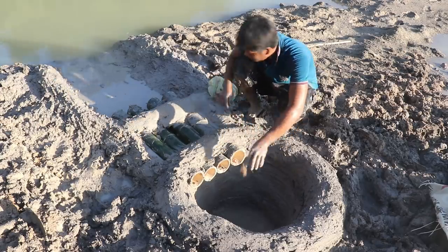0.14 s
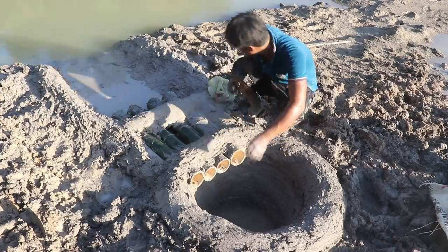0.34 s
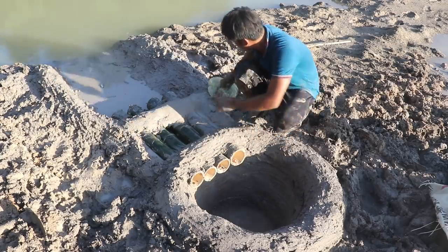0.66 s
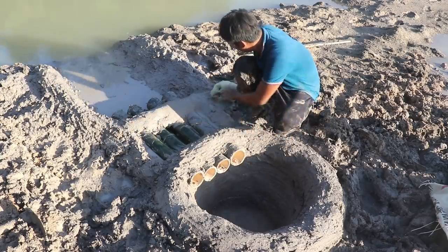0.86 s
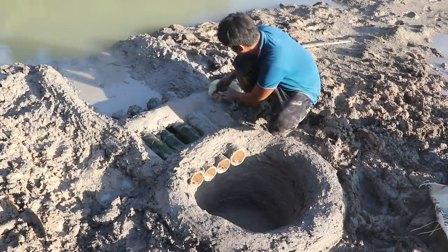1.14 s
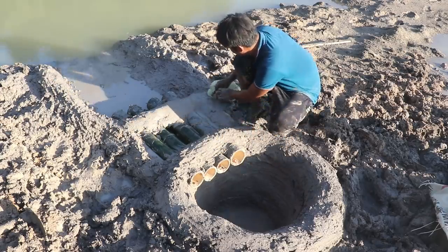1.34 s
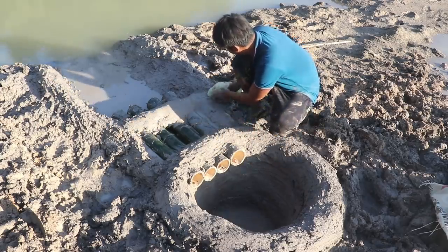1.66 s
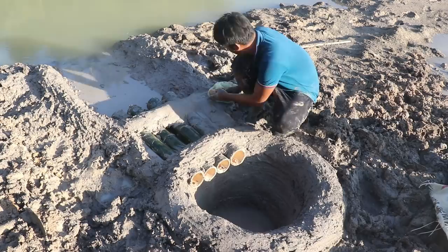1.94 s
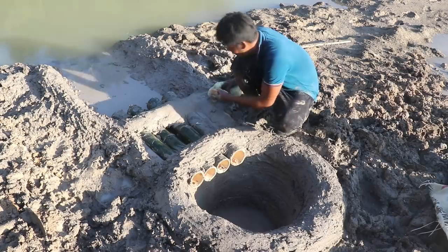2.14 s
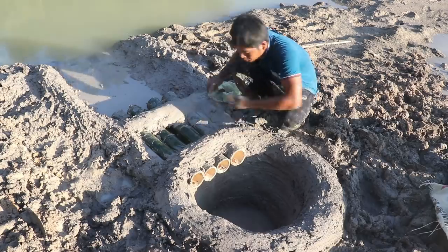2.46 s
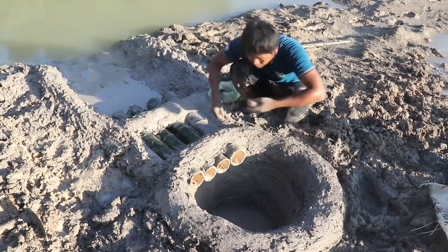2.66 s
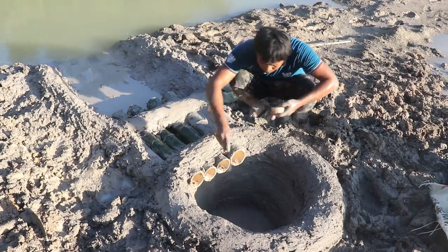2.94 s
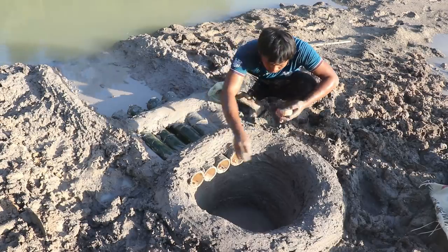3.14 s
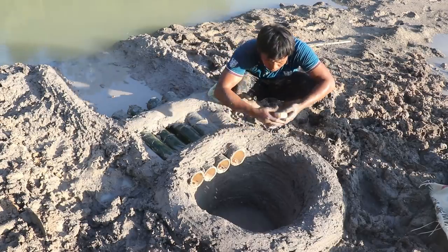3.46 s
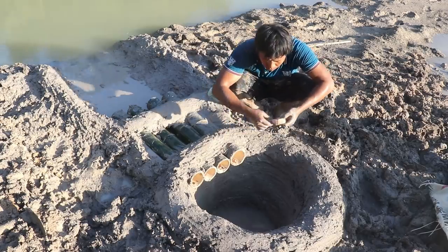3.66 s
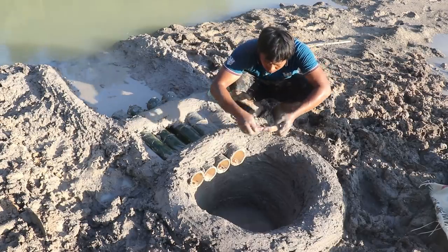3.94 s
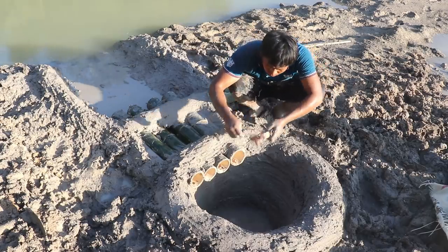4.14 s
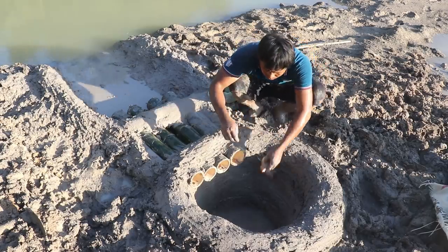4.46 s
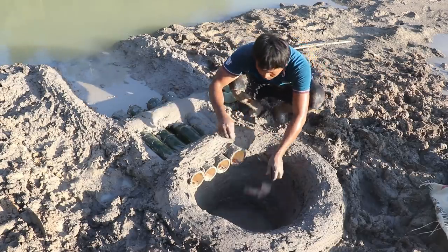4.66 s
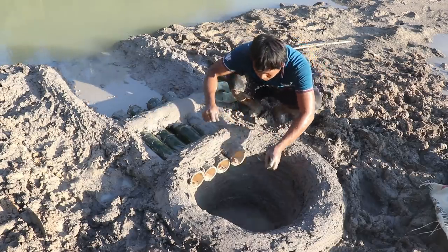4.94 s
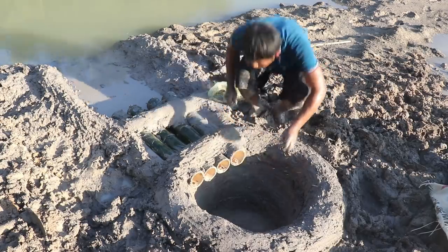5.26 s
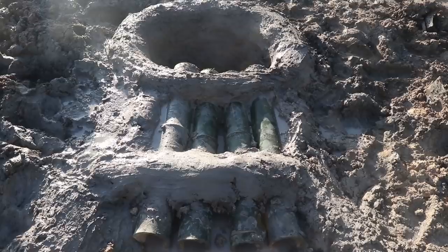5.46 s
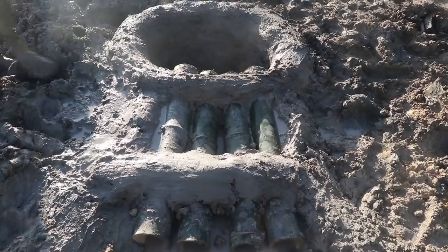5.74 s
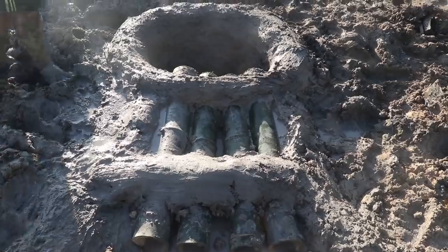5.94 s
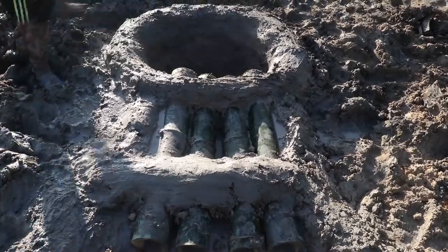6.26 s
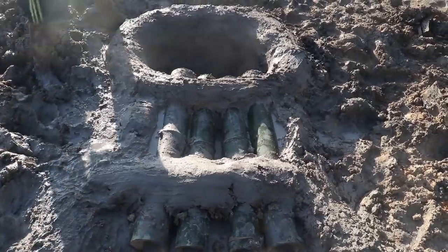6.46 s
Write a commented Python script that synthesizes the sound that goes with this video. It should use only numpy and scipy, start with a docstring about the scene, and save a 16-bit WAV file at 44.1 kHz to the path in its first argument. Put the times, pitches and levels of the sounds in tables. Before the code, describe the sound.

Sparse, close wet mud sounds: light splats and pops, a quiet stretch of grainy palm strokes, a clear plop with bubbles, then busier sticky squelching. Finally the view moves nearer and central, with brighter faint sand rubs and small sharp pats, and the cricket disappears. Open-air stereo, almost no echo, with soft hiss, low rumble, a distant engine and rare tiny bird whistles.

```python
"""Wet mud splats and air pockets pop in slurry as hands work a pond bank; palms rub over gritty wet sand.
One clod plops into a water-filled pit. Behind, a far engine drones, insects sing and small birds whistle.
Splats are torn noise bursts, bubbles decaying sines, sand a stream of clicks; the engine is a few harmonics.
Late on, the work is heard from a nearer spot, in front rather than to the right, and the cricket is gone."""
import sys
import numpy as np
from scipy import signal
from scipy.fft import rfft, irfft, next_fast_len
from scipy.io import wavfile
from scipy.ndimage import uniform_filter1d, map_coordinates

SR = 44100
rng = np.random.default_rng(int(sys.argv[2]) if len(sys.argv) > 2 else 0)


def digitize_waveform(pressure):
    """Quantize a signal to 16-bit integers and store it at the path in sys.argv[1].

    Rows of a 2-D input are taken as channels; values are limited to [-1, 1].
    """
    field = np.atleast_2d(pressure).T
    bounded = np.clip(field, -1, 1)
    quanta = np.round(bounded * 32767).astype(np.int16)
    wavfile.write(sys.argv[1], SR, quanta)


N = 290607
TIME = np.arange(N) / SR
CLOSER_S = 5.445   # from here on the work is heard from close by, and from the front


def from_db(db):
    """Decibels to gain."""
    return 10 ** (np.asarray(db) / 20)


def rms_one(x):
    """Scale to unit power."""
    return x / np.sqrt(np.mean(x ** 2) + 1e-20)


def in_time(rows):
    """Draw each column of a breakpoint curve out to every sample."""
    s, *columns = np.transpose(rows)
    return [np.interp(TIME, s, column) for column in columns]


def gate(start, end, edge=0.0084):
    """One between two moments, with soft edges lasting `edge` seconds."""
    return np.clip(np.minimum(TIME - start, end - TIME) / edge + .5, 0, 1)


def nearer_gain(db):
    """A gain that sets in with the move to the nearer spot."""
    return from_db(db * (TIME > CLOSER_S))


def band(x, low_hz, high_hz, order=2):
    """Causal band-pass, its top edge kept safely below half the sample rate."""
    edges = [low_hz, min(high_hz, SR * 9 / 20)]
    return signal.sosfilt(signal.butter(order, edges, "band", fs=SR, output="sos"), x + 1e-18)


def coloured(x, colour):
    """Give noise a smooth spectrum that fades out below its lowest point; rms 1."""
    hz, db = np.transpose(colour)
    size = next_fast_len(N)
    bins = np.maximum(np.fft.rfftfreq(size, 1 / SR), 1)
    gain = from_db(np.interp(np.log(bins), np.log(hz), db)) * np.minimum(bins / hz[0], 1) ** 2
    return rms_one(irfft(rfft(x, size) * gain, size)[..., :N])


def drift(rate):
    """Smooth random wandering of spread 1, with `rate` new values per second."""
    knots = rng.standard_normal(4096)
    return rms_one(map_coordinates(knots, [TIME * rate], order=2, mode="wrap"))


def stereo_noise(likeness):
    """White noise, partly shared by both ears."""
    mid, side = rng.standard_normal((2, N))
    likeness = np.clip(likeness, 0, 1)
    return np.sqrt(1 + likeness) * mid + np.sqrt(1 - likeness) * side * [[1], [-1]]


def grains(per_s, spread_db, size=N):
    """Tiny clicks of uneven size and either sign at random moments."""
    sizes = from_db(spread_db * np.minimum(rng.exponential(1, size), 4))
    return (rng.random(size) < per_s / SR) * sizes * rng.choice([-1, 1], size)


def add(out, s, sound):
    """Mix a short sound in at a moment."""
    i = max(int(s * SR), 0)
    out[i:i + len(sound)] += sound[:max(N - i, 0)]


def splats():
    """Mud strikes or parts: every splat has the same four bands, tilted by its brightness."""
    # Mud contacts. Each row: start in seconds, contact length in seconds, level in dB,
    # brightness in dB per octave (heavy clods dull, thin films bright).
    contacts = [(.141, 0.0025, -49.5, -0.5), (.41, 0.011, -47, 8.5), (.497, .0044, -33.5, 4.5),
                (.524, .007, -48, -1), (0.807, 0.0058, -42, 4.5), (3.229, 0.019, -44.5, 1),
                (3.275, 0.0024, -40, -3), (3.287, 0.0069, -27.5, 1.5), (3.5495, 0.0056, -40.5, 8.5),
                (3.625, .01, -40, -2), (3.944, 0.008, -35.5, -2), (3.952, 0.0032, -33.5, 2),
                (3.977, 0.0048, -41, 7.5), (4.876, 0.0035, -35, 0), (4.882, 0.031, -42, 3.5),
                (4.914, 0.023, -38, -2.5), (5, .022, -25, -5), (5.023, 0.011, -23, -1.5),
                (5.2449, 0.0025, -32.5, 0.5), (5.309, 0.0042, -33.5, -3), (5.3938, 0.0018, -22.5, 1),
                (5.403, 0.0068, -34.5, 1.5), (5.433, 0.0036, -45, 3), (5.633, 0.0034, -42, -4.5),
                (5.766, 0.0026, -44.5, -4), (5.985, 0.0037, -50, -12), (6.058, .026, -39.5, -3),
                (6.29, 0.01, -38, -1), (6.3545, 0.0013, -30.5, 1.5), (6.544, 0.0041, -34.5, -2),
                (6.553, 0.0019, -28, -2)]
    # Body, squelch, spray and mist. Each row: low edge in Hz, high edge in Hz, level in dB, t60 in seconds.
    parts = [(380, 850, -15, 0.026), (1203.7, 3730, -3.5, 0.028), (5650, 10900, -5, 0.026),
             (12000, 15000, -26, 0.025)]
    pivot_hz = 2240   # brightness tilts the bands about this pitch
    out = np.zeros(N)
    for s, length, db, brightness in contacts:
        for low, high, own_db, t60 in parts:
            tilt_db = brightness * np.log2(np.sqrt(low * high) / pivot_hz)
            add(out, s, from_db(db + own_db + tilt_db) * tearing(length, low, high, t60))
    return out


def tearing(length, low_hz, high_hz, t60, attack=.0016, settle_db=-21, settle_t60=0.26, ragged_db=5.0):
    """Water films tear in clumps of micro-clicks while contact lasts; crumbs and droplets then settle."""
    t = np.arange(SR // 8) / SR
    after = np.maximum(t - length * 0.71, 0)
    decay = from_db(-60 * after / t60)
    settling = from_db(settle_db - 60 * after / settle_t60)
    shape = np.minimum(t / attack, 1) * (decay + settling)
    clumps = from_db(ragged_db * rms_one(uniform_filter1d(rng.standard_normal(len(t)), size=40)))
    clicks = grains(per_s=6000, spread_db=-1.0, size=len(t)) * shape * clumps
    burst = band(clicks, low_hz, high_hz, order=3 if high_hz < 2000 else 2)
    # the energy equals that of a unit-rms sound lasting as long as the contact
    return burst * np.sqrt(length * SR / (np.sum(burst ** 2) + 1e-20))


def plop():
    """The water-filled pit answers the falling clod with a low thud."""
    out = np.zeros(N)
    thud = tearing(length=0.011, low_hz=103, high_hz=262, t60=0.045)
    add(out, 3.288, from_db(-36.5) * thud)
    return out


def pops():
    """The larger air pockets, one by one: mud damps a buried one, a free one rings on and climbs."""
    # Loudest air pockets. Each row: start in seconds, level in dB, pitch in Hz,
    # freedom (no unit: 0 buried in mud, 1 at the surface).
    pockets = [(.143, -39.5, 654, 0.25), (.4985, -29.5, 3250, 0.33), (.499, -32, 2510, 0),
               (.528, -40, 3030, .3), (.779, -42, 1780, .5), (.809, -29, 1120, 0.33), (3.23, -40, 1508, .1),
               (3.232, -31, 3900, 0.05), (3.274, -25, 1644, 0), (3.29, -31.5, 635, 0),
               (3.2906, -24.5, 1707, 0), (3.291, -20.5, 3950, 0), (3.292, -29.5, 386, 0),
               (3.346, -40.5, 3400, 0.36), (3.551, -29, 5720, 0.17), (3.61, -31, 3340, .3),
               (3.626, -35.5, 1480, 0.38), (3.677, -38.5, 391, 0.49), (3.779, -47.5, 1100, 0.85),
               (3.954, -29.5, 3700, 0.77), (3.977, -27.5, 3370, 0.322), (4.89, -29.5, 2950, 0.55),
               (4.914, -26, 2730, 0.72), (5.002, -16.5, 426, 0.18), (5.002, -17, 1860, 0.28),
               (5.003, -28, 730, 0.0069), (5.017, -19, 2660, 0), (5.026, -24.5, 757, 0.036),
               (5.082, -31.5, 3130, .55), (5.112, -27.5, 3080, 0.82), (5.159, -32, 3534, 0.071),
               (5.294, -26.5, 2380, 0.12), (5.311, -37, 1527, 1), (5.349, -32.5, 791, .6),
               (5.743, -39, 1372, 0), (6.546, -29.5, 1320, 0)]
    ring_s, ring_hz, ring_slope = 0.044, 980, 0.67   # t60 of a buried pocket at this pitch; higher ones die sooner
    free_ring, free_rise_octaves = 1.35, 0.88   # at the surface: this many times longer again, and this climb
    out = np.zeros(N)
    for s, db, hz, freedom in pockets:
        free = np.clip(freedom, 0, 1)
        t60 = ring_s * (ring_hz / hz) ** ring_slope * (1 + free_ring * free)
        add(out, s, from_db(db) * bubble(hz, t60, free_rise_octaves * free ** 2))
    return out


def bubble(hz, t60, rise, swell_cycles=0.71, wobble=0.044):
    """An air pocket swells into ringing; mud squeezes its pitch about, and it climbs by `rise` octaves."""
    t = np.arange(int(t60 * SR) + 2) / SR
    squeeze = np.interp(t, np.linspace(0, t60, num=16), rng.standard_normal(size=16))
    octaves = rise * t / t60 + wobble * squeeze
    phase = 2 * np.pi * np.cumsum(hz * 2 ** octaves) / SR
    swell = 1 - np.exp(-t * hz / swell_cycles)
    return np.sin(phase) * np.exp(-np.log(1000) * t / t60) * swell


def slurry(bubble_db=-2.0, fizz_db=-5.5, sticky_db=-10):
    """Stirred slurry: gliding bubbles, a spray of tiny ones, bursting films and sticky crackle, in spurts."""
    # Handfuls stirring the slurry. Each row: start in seconds, end in seconds, level in dB at the start.
    stirs = [(3.556, 3.706, -47.5), (4.88, 4.99, -44.5), (4.99, 5.3, -38.5), (5.294, 5.443, -39),
             (5.962, 6.117, -53.5)]
    settle_db_per_s = 44   # stirred slurry calms down
    bubbles = swarm(per_s=620, low_hz=750, high_hz=3900, cycles=40, spread_db=3.4, rise=1)
    tiny = swarm(per_s=400, low_hz=3000, high_hz=11500, cycles=40, spread_db=4, rise=.2)
    films = rms_one(band(grains(per_s=4000, spread_db=4), 2500, 12000, order=1))
    sticky = rms_one(band(grains(per_s=1100, spread_db=2.5), 830, 4100))
    fizz = rms_one(tiny + films)
    spurts = rms_one(from_db(2 * drift(90)))
    stirring = np.zeros(N)
    for start, end, db in stirs:
        calming_db = settle_db_per_s * np.maximum(TIME - start, 0)
        stirring += from_db(db - calming_db) * gate(start, end)
    mix = from_db(bubble_db) * bubbles + from_db(fizz_db) * fizz + from_db(sticky_db) * sticky
    return spurts * stirring * mix


def swarm(per_s, low_hz, high_hz, cycles, spread_db, rise):
    """Bubbles born at random, the small high ones most often, each ringing for some cycles; rms 1."""
    out = np.zeros(N)
    for when, size, strength, climb in rng.random((int(per_s * N / SR), 4)):
        hz = low_hz * (high_hz / low_hz) ** np.sqrt(size)
        gain = from_db(-spread_db * np.log(strength + 0.04))
        add(out, when * N / SR, gain * bubble(hz, cycles / hz, rise * climb))
    return rms_one(out)


def rubbing(pivot_hz=5000):
    """Fine sand and a few coarse crumbs drag under the palm, which sticks and slips; strokes swell and fade."""
    # Palms sliding on wet sand. Each row: middle in seconds, half-length in seconds, level in dB.
    slides = [(0.749, 0.068, -52), (.88, 0.062, -49), (1.167, 0.11, -49.5), (1.433, 0.047, -52),
              (1.653, 0.098, -54.5), (1.873, 0.066, -52.5), (2.021, 0.039, -55), (2.22, 0.13, -59),
              (5.5, 0.086, -58), (5.891, 0.045, -50.5), (5.996, 0.04, -48.5), (6.067, 0.036, -44),
              (6.28, 0.091, -51), (6.57, 0.057, -54)]
    # Spectrum of rubbed sand. Each row: frequency in Hz, relative level in dB per Hz.
    sand_colour = [(400, -39), (1000, 4), (2800, 4), (4700, -1.5), (7500, 3.5), (10000, 1), (13000, -9),
                   (16000, -9)]
    # sand is brighter when pressed harder than this level, and when heard from close by
    pivot_db, brightens = -50, 0.12   # dB; dB per octave per dB
    close_brightness = 6.5   # dB per octave
    stick_slip = from_db(1.7 * drift(110))
    sand = rms_one(grains(per_s=7000, spread_db=3.5) * stick_slip)
    crumbs = rms_one(grains(per_s=400, spread_db=4))
    grit = sand + crumbs / 2
    out = np.zeros(N)
    for s, half, db in slides:
        brightness = brightens * (db - pivot_db) + close_brightness * (s > CLOSER_S)
        colour = [(hz, own + brightness * np.log2(hz / pivot_hz)) for hz, own in sand_colour]
        swell = np.exp(-((TIME - s) / half) ** 2 / 2)
        fresh_grit = np.roll(grit, rng.integers(N))   # every stroke meets another patch of sand
        out += from_db(db) * swell * coloured(fresh_grit, colour)
    return out


def on_the_bank(x, side_db=4, front_db=1.0, side_lag=0.96, front_lag=-1.33, bank_db=-19, bank_t60=0.16):
    """Sound comes from the right, later from the front; lumps scatter the treble, the bank adds a faint tail."""
    in_front = TIME > CLOSER_S
    pan_db = np.where(in_front, front_db, side_db)   # right over left
    lag = np.where(in_front, front_lag, side_lag)   # left ear behind the right, in samples
    left = map_coordinates(x, [np.arange(N) - lag], order=3)
    # two scattered treble patterns trade places at random, so the ears differ from moment to moment
    treble, place = band(x, 2700, 22000, order=1), np.pi * drift(20)
    lumps = from_db(-4) * sum(scatter(treble * np.sin(place + turn), t60=.008) for turn in (0, np.pi / 2))
    direct = np.array([left, x])
    return (direct + lumps) * from_db([-pan_db / 2, pan_db / 2]) + from_db(bank_db) * scatter(x, bank_t60)


def scatter(x, t60):
    """A short burst of dense echoes, different at each ear, of unit power."""
    t = np.arange(SR // 6) / SR
    tails = rng.standard_normal((2, len(t))) * np.exp(-np.log(1000) * t / t60)
    tails = tails / np.sqrt(np.sum(tails ** 2, axis=1, keepdims=True))
    return signal.oaconvolve(x[None], tails, axes=1)[:, :N]


def birds(quaver_hz=95):
    """Thin arched whistles with a quick quaver, fluttering on their way through the air."""
    # Bird calls. Each row: start in seconds, length in seconds, level in dB before the flutter,
    # pitch in Hz, glide in octaves.
    calls = [(1.302, 0.1, -49, 6600, 0.1), (2.387, 0.14, -61, 8830, .1), (3.105, .088, -60, 5760, .02),
             (3.921, 0.024, -49, 5790, -0.027), (6.36, 0.043, -56, 11300, -0.1)]
    arch_octaves = 0.0206   # bends each whistle upwards in its middle
    quaver = quaver_hz * drift(500)
    flutter = from_db(3 * drift(120) - 2)
    out = np.zeros(N)
    for s, length, db, pitch, glide in calls:
        u = np.linspace(-1, 1, int(length * SR))
        octaves = glide * u / 2 - arch_octaves * u ** 2
        hz = pitch * 2 ** octaves + quaver[int(s * SR):][:len(u)]
        whistle = np.sin(2 * np.pi * np.cumsum(hz) / SR)
        add(out, s, from_db(db) * np.sqrt(1 - u ** 2) * whistle)
    return out * flutter


def engine(orders_db=(-1, -11, -21, -23), waver_db=0.2):
    """Only the lowest firing orders of the engine carry this far, wavering a little on the way."""
    # Far engine, as a curve. Each row: time in seconds, firing rate in Hz, level in dB.
    running = [(0.0, 40.5, -60), (0.59, 37.46, -58), (0.9, 43, -55.5), (1.23, 43.65, -55.5),
               (1.58, 49.73, -46), (2.29, 54.2, -46), (2.77, 51.3, -47.5), (3.03, 52.7, -51),
               (3.72, 47.5, -54.5), (3.95, 52.1, -67), (4.09, 50.7, -51), (4.31, 54, -48.5),
               (4.62, 47.4, -53.5), (4.92, 56.35, -45.5), (5.17, 45.97, -56), (5.36, 50, -50),
               (6.31, 47.8, -58.5), (6.59, 51.3, -72)]
    hz, db = in_time(running)
    phase = 2 * np.pi * np.cumsum(hz) / SR
    drone = np.zeros(N)
    for order, own_db in enumerate(orders_db, start=1):
        drone += from_db(db + own_db + waver_db * drift(6.2)) * np.sin(order * phase)
    return np.sqrt(2) * drone


def insects():
    """A cricket's thin trill with short breaks, and another insect's pulsing rasps."""
    return cricket() + rasping()


def cricket(hz=2738, width_hz=14, tone_db=-61, octave_db=-75, pause_s=0.032):
    """A tone of jittery pitch and its octave; the tone is a quarter cycle apart between the ears."""
    # Middles of the short breaks in the trill. Each entry: time in seconds.
    pauses = [.03, .22, 1.02, 2.25, 2.47, 2.68, 3.06, 3.47, 4.05, 4.29, 4.481]
    phase = 2 * np.pi * np.cumsum(hz + width_hz * drift(90)) / SR
    ears = []
    for turn in (0, np.pi / 2):
        octave = from_db(octave_db + 2 * drift(8)) * np.sin(2 * phase)
        ears.append(from_db(tone_db) * np.sin(phase + turn) + octave)
    flutter = from_db(1.8 * drift(25))
    breaks = sum(gate(s - pause_s / 2, s + pause_s / 2, edge=0.026) for s in pauses)
    singing = (TIME < CLOSER_S) * (1 - breaks)
    return np.array(ears) * flutter * singing


def rasping(low_hz=7250, high_hz=7700, rate_hz=56, depth=0.37):
    """Narrow noise pulsing in strength, in softly edged phrases."""
    # Rasping phrases. Each row: start in seconds, end in seconds, level in dB.
    rasps = [(0, .17, -64.5), (2.226, 2.354, -63), (2.487, 2.71, -65), (2.865, 3.046, -65)]
    phrases = sum(from_db(db) * gate(start, end, edge=0.061) for start, end, db in rasps)
    rasp = rms_one(band(stereo_noise(likeness=0.27), low_hz, high_hz))
    return phrases * rasp * (1 + depth * np.sin(2 * np.pi * rate_hz * TIME))


def air(rumble_db=-56, hiss_db=-53, close_rumble_db=2.5, close_hiss_db=2.24):
    """Low rumble and soft hiss of open country, both a little stronger at the nearer spot."""
    # Spectra of the rumble and of the hiss. Each row: frequency in Hz, relative level in dB per Hz.
    rumble_colour = [(18, -34), (28, -9.5), (42, 2), (65, -2), (100, -5.5), (160, -10.5), (250, -18.5),
                     (500, -49)]
    hiss_colour = [(120, 1.5), (250, 2.5), (450, 2), (900, -3.5), (2000, -8.5), (3000, -11), (4800, -18),
                   (6500, -15.5), (7700, -10.5), (9000, -15.5), (12000, -19), (16000, -29.5)]
    rumble = coloured(stereo_noise(likeness=0.81), rumble_colour)
    hiss = coloured(stereo_noise(likeness=0.067), hiss_colour)
    low = from_db(rumble_db) * nearer_gain(close_rumble_db) * rumble
    high = from_db(hiss_db) * nearer_gain(close_hiss_db) * hiss
    return low + high


def scene():
    """Mud work, with the birds placed alongside it, in front of the far surroundings."""
    mud_work = splats() + plop() + pops() + slurry() + rubbing()
    return on_the_bank(mud_work + birds()) + engine() + air() + insects()


def record(dry):
    """The top is cut steeply above 16 kHz."""
    return signal.sosfilt(signal.ellip(10, .1, 80, 16000, fs=SR, output="sos"), dry)


dry = scene()
out = record(dry)
digitize_waveform(out)
```